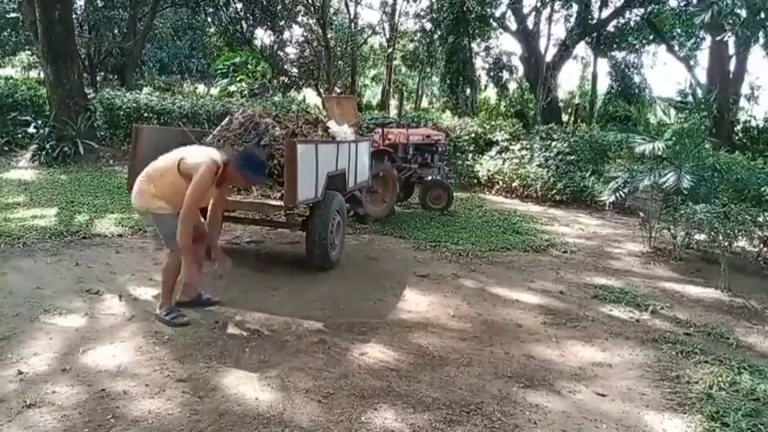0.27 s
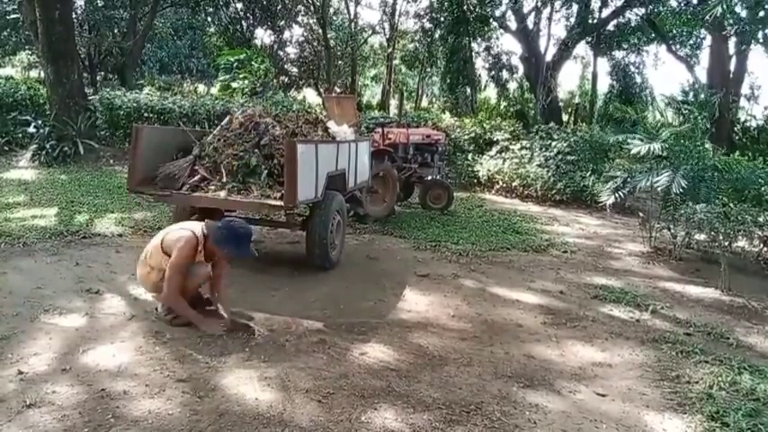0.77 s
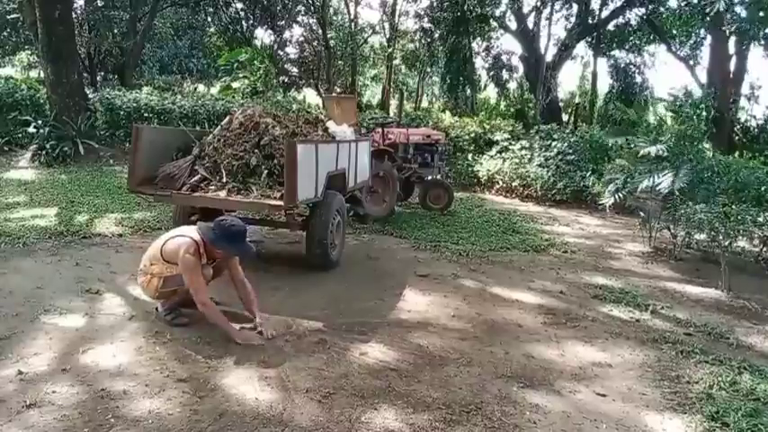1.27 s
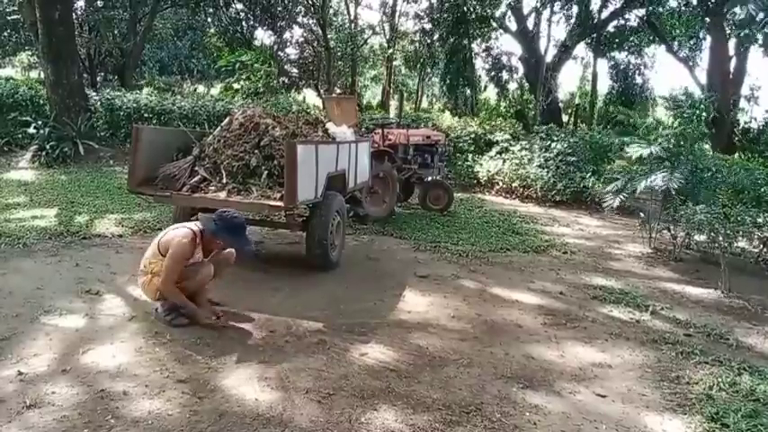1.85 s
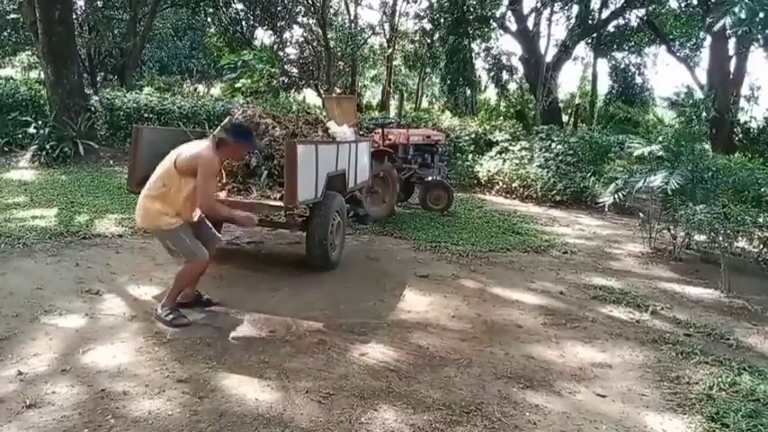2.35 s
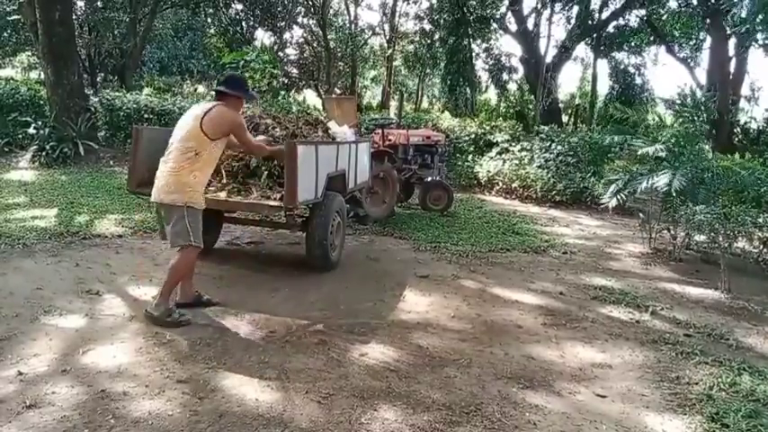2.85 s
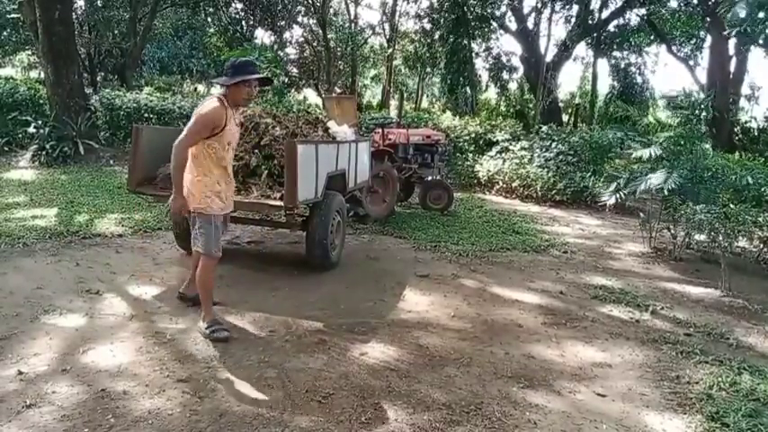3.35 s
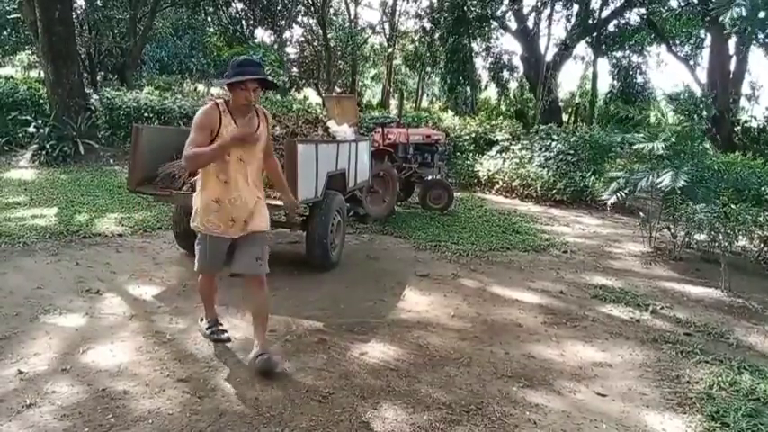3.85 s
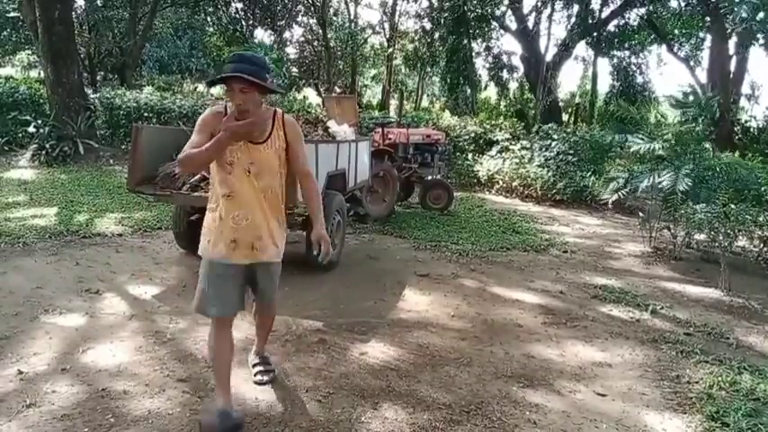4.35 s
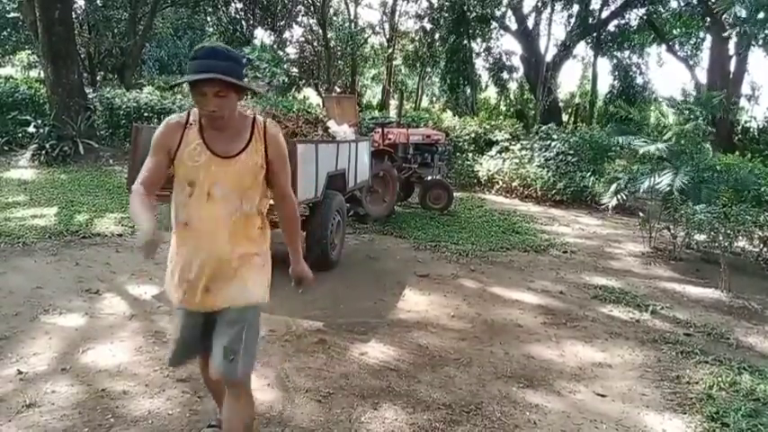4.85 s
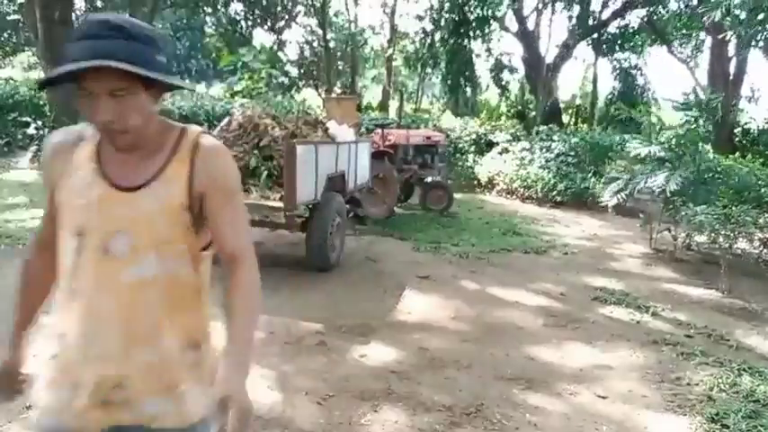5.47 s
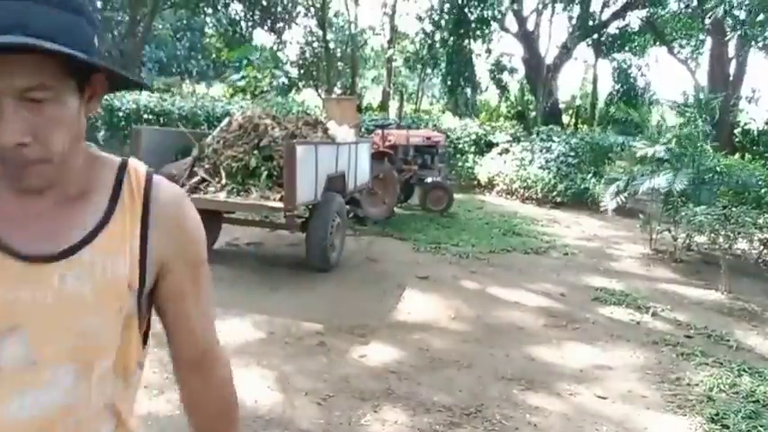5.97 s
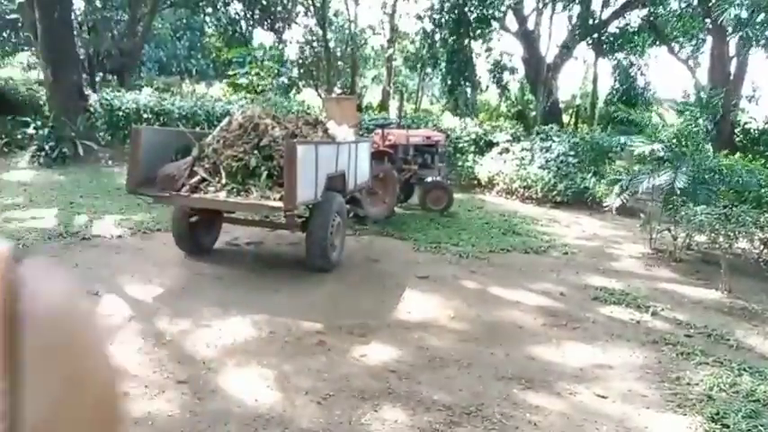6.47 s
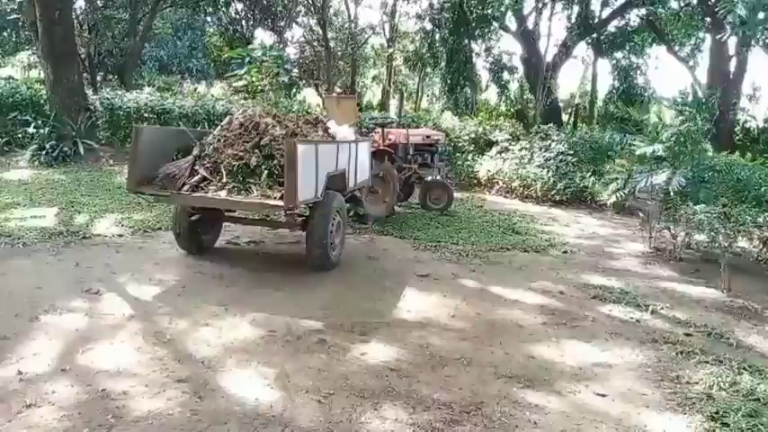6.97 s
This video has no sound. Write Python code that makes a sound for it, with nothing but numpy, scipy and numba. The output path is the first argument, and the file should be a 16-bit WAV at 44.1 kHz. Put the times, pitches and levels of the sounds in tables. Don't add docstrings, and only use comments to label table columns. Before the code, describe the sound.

Low, fluttering wind thuds dominate, with hard membrane slaps early and near two, four and six seconds. Behind them lie distant insects, leaves, a faint throbbing croak and scattered bird whistles blurred by foliage. Twigs knock quietly on a cart, then someone walks up in sandals, crunching grit close to the phone before lighter scuffs end it. The background dips after strong gusts and slowly returns.

```python
import sys
import numpy as np
from scipy import signal
from scipy.io import wavfile
from scipy.ndimage import uniform_filter1d
from numba import njit

SR = 44100
rng = np.random.default_rng(int(sys.argv[2]) if len(sys.argv) > 2 else 0)


def generate_wav(signal):
    frames = np.transpose(np.atleast_2d(signal))
    scaled = np.clip(frames, -1, 1) * 32767
    pcm = np.round(scaled).astype(np.int16)
    wavfile.write(sys.argv[1], SR, pcm)


def makeup_ratio(level_db):
    decades = np.asarray(level_db, float) / 20
    return 10 ** decades


N = 318843
T = np.arange(N) / SR


def columns(table):
    time_s, *values = np.transpose(table)
    return [np.interp(T, time_s, value) for value in values]


def unit(x):
    return x / np.sqrt(np.mean(x ** 2))


@njit
def svf(x, hz, width):
    y, b, l, g, last = np.empty(len(x)), 0., 0., 0., 0.
    for i in range(len(x)):
        if hz[i] != last:
            g, last = np.tan(np.pi * hz[i] / SR), hz[i]
        k = width[i] / hz[i]
        v = (b + g * (x[i] - l)) / (1 + g * (g + k))
        b, l, y[i] = 2 * v - b, l + 2 * g * v, k * v
    return y


def band(x, hz, width_hz):
    return svf(x, np.clip(hz + 0 * T, 20, .45 * SR), np.maximum(width_hz + 0 * T, 5))


def edges(x, low_hz, high_hz):
    return signal.sosfilt(signal.butter(4, [low_hz, high_hz], "bandpass", fs=SR, output="sos"), x)


def below(x, hz):
    return signal.sosfilt(signal.butter(8, hz, fs=SR, output="sos"), x)


def walk(rate):
    hold = int(SR / rate)
    levels = np.repeat(rng.standard_normal(N // hold + 1), hold)
    return 0.88 * uniform_filter1d(uniform_filter1d(levels, hold), hold)[:N]


def steady(x, hold_s, share):
    power = uniform_filter1d(x ** 2, int(hold_s * SR)) + 0.16 * np.mean(x ** 2)
    return unit(x / power ** (share / 2))


def humps(centre_s, half_s, db, edge_db, square, hasty=0.):
    power = np.zeros(N)
    for s, half, top_db in zip(centre_s, half_s, db):
        near = slice(max(int((s - 4 * half) * SR), 0), int((s + 4 * half) * SR))
        away = np.abs((T[near] - s) / half * (1 + hasty * (T[near] < s)))
        power[near] += makeup_ratio(2 * (top_db - edge_db * away ** square))
    return np.sqrt(power)


def gain_db():
    # (time [s], drop [dB])
    ducks = [
        (.487, 10.5),
        (1.866, 1.5),
        (2.0, 0),
        (2.45, 0.5),
        (3.45, 0),
        (4.56, 1),
        (5.62, 0.5),
        (6.17, 4),
        (7.15, 2.5),
    ]
    opening_db, recover_s = 4, 1
    out = opening_db * (T < ducks[0][0])
    for s, drop_db in ducks:
        out = out - drop_db * (T >= s) * np.exp(-np.abs(T - s) / recover_s)
    return out


def patches(shape, size):
    field = rng.standard_normal(shape)
    for axis in (0, 0, 1, 1):
        field = uniform_filter1d(field, size[axis], axis=axis)
    return unit(field)


def hiss(spectrum, patch_db, swell_db):
    f, _, z = signal.stft(rng.standard_normal(N), SR, nperseg=1024)
    hz, db = np.transpose(spectrum)
    colour_db = np.interp(np.log(f + 1), np.log(hz), db, left=-99, right=-99)[:, None]
    patch_db = patch_db * np.clip((12500 - f[:, None]) / 1500, .3, 1)
    mottle_db = patch_db * patches(z.shape, size=(3, 3)) + swell_db * patches(z.shape, size=(30, 6))
    return signal.istft(z * makeup_ratio(colour_db + mottle_db), SR)[1][:N]


def whistle(hz, width_hz):
    air = band(rng.standard_normal(N), hz, width_hz)
    return steady(band(air, hz, 0.48 * width_hz), 0.012, 0.19)


def frogs(level_db):
    throb = np.sin(np.pi * np.cumsum(14.8 * (1 + 0.17 * walk(6.7))) / SR) ** 2
    return makeup_ratio(level_db + 1.4 * walk(2.9)) * throb ** 1.6 * whistle(1280 + 30 * walk(11), 57)


def yard():
    # (frequency [Hz], level [dB per Hz])
    insect_colour = [(2350, -9), (4000, -63), (4810, -11.5), (5520, -0.5), (6050, -9), (6230, -1),
                     (6630, 4.5), (8740, -8), (9420, -18), (10800, -6), (11300, -14), (12200, -25.5),
                     (13400, -23), (14900, -22), (15800, -15)]
    # (frequency [Hz], level [dB per Hz])
    leaf_colour = [(35, -49), (60, 0), (139, 7), (172, -1.5), (305, -8), (334, -12.5), (406, -11.5),
                   (635, -17), (707, -13), (1030, -14.5), (1230, -8.5), (1350, -12), (2260, -20),
                   (2700, -16.5), (4300, -24.5), (5590, -23.5), (9460, -120)]
    # (centre [s], half length [s], insects [dB], leaves [dB])
    swells = [
        (0.0, 0.27, -35, -42),
        (1.695, 0.28, -43.5, -51.5),
        (3.283, 0.13, -39, -46),
        (4.376, 0.26, -41, -45.5),
        (5.502, 0.39, -47, -44.5),
        (6.094, 0.14, -39.5, -42.5),
    ]
    s, half, insects_db, leaves_db = np.transpose(swells)
    gain = gain_db()
    insects_gain = np.hypot(makeup_ratio(-38 + gain), humps(s, half, insects_db, 9, 6))
    leaves_gain = np.hypot(makeup_ratio(-42 + gain), humps(s, half, leaves_db, 10, 3.1))
    insects = hiss(insect_colour, 3.94, 0.61)
    leaves = hiss(leaf_colour, 3.35, 1.03)
    insects = insects / np.std(edges(insects, 6200, 9000))
    leaves = leaves / np.std(edges(leaves, 500, 3500))
    return insects_gain * insects + leaves_gain * (leaves + frogs(-3.0))


def slaps():
    # (time [s], peak [dB], edge [dB])
    slap_list = [(0.453, -5, -18), (0.48, 2.5, -14), (1.442, -25, -47), (1.858, -14, -20.5),
                 (1.906, -20, -44), (2.438, -23, -38), (2.829, -16, -32), (3.274, -20, -45),
                 (4.249, -9, -59), (4.263, -6, -60), (4.557, -20, -45), (5.652, -24, -36),
                 (5.979, -24, -43), (6.133, -23, -17), (6.498, -33, -31), (6.679, -22, -47),
                 (6.897, -25.5, -47)]
    slap_hz = 148
    turn = np.arange(int(2 * SR / slap_hz)) * slap_hz / SR
    swing = np.sin(2 * np.pi * turn) * np.exp(-((turn - 1) / 0.34) ** 2)
    out, edge = np.zeros(N), np.zeros(N)
    for s, db, edge_db in slap_list:
        i = int((s + 0.00495 - 1 / slap_hz) * SR)
        out[i:i + len(turn)] -= makeup_ratio(db + 6.0) * swing
        edge[i + int(.9 * SR / slap_hz)] = -makeup_ratio(edge_db)
    return out + 30 * band(band(edge, 640, 460), 470, 730)


def wind():
    # (centre [s], half length [s], rumble [dB],
    # flap above a level 20 dB under the rumble [dB])
    gusts = [(0.06, 0.044, -8, -8), (0.14, 0.019, -8, -9), (0.281, .022, -11, -13),
             (0.414, 0.015, -10.5, 5), (0.465, 0.051, -12.5, 3), (1.86, 0.024, -4.5, 1),
             (1.916, 0.017, -5, 7), (1.992, 0.032, -12.5, -1.5), (2.246, 0.019, -12.5, 0),
             (2.449, 0.014, -6.5, 7), (2.616, 0.041, -12, 2), (2.843, 0.027, -7.5, 7.5),
             (2.936, 0.035, -13.5, -2), (3.081, 0.046, -16, 4), (3.275, 0.025, -17, 12),
             (4.206, 0.046, -16.5, -3), (4.262, 0.022, -8.5, 11), (4.364, 0.026, -17.5, -7),
             (4.571, 0.028, -14.5, -4), (5.059, .04, -15, -1), (5.122, 0.015, -14, -6),
             (5.164, 0.014, -18, -2), (5.522, 0.03, -10.5, 3), (5.565, 0.027, -11, 7),
             (6.065, 0.04, -5, 2), (6.137, 0.026, -3.5, -8), (6.216, 0.03, -17, -8),
             (6.448, 0.026, -18, 1), (6.502, 0.0099, -6.5, -4),
             (0.22, 0.046, -26, 0), (0.559, 0.029, -20.5, 8), (0.696, 0.037, -32, -9),
             (1.002, 0.091, -39.5, 0), (1.363, 0.077, -30.5, -7), (1.461, 0.021, -19.5, 6),
             (1.545, 0.069, -28, 6.5), (1.668, .05, -23.5, -4), (1.803, 0.067, -25, -3),
             (2.183, 0.042, -24, -6), (2.399, 0.042, -19.5, 2), (4.02, 0.025, -42, 0),
             (4.325, 0.021, -20.5, -4), (4.42, 0.024, -27.5, 11), (4.486, 0.034, -28, -11),
             (4.74, 0.12, -24.5, -8), (4.832, .03, -22.5, 9), (4.936, 0.058, -22.5, -8),
             (5.361, 0.058, -24.5, -5), (5.692, 0.044, -23, 3), (5.771, 0.04, -20, -9),
             (5.968, 0.039, -22, -3), (6.3, 0.039, -27, -4), (6.375, 0.016, -20, -2),
             (6.577, 0.032, -25, -4), (6.686, 0.028, -23, 2), (6.747, 0.044, -24, 0),
             (6.91, 0.092, -24.5, 5), (7.053, 0.089, -30.5, 2), (7.198, 0.031, -24.5, 7)]
    edge_db, square, calm_db = 9, 2.13, -48.5
    s, half, db, flap_db = np.transpose(gusts)
    rumble_gain = humps(s, half, db, edge_db, square) + makeup_ratio(calm_db + gain_db())
    flap_gain = humps(s, 0.65 * half, db + flap_db - 20.0, edge_db, square)
    eddy_hz = 80 + 39.5 * rumble_gain
    eddies = below(band(rng.standard_normal(N), eddy_hz, 56.4), 153.5)
    eddies = steady(eddies, 0.0267, 0.45)
    flap = steady(edges(rng.standard_normal(N), 148.4, 267), 0.004, 0.46)
    out = below(rumble_gain * eddies + flap_gain * flap, 237) + slaps()
    return signal.sosfilt(signal.butter(3, 48, "highpass", fs=SR, output="sos"), out)


def calls(table, sag_hz):
    pitch_hz, loud = np.full((2, N), 1000.), np.zeros((2, N))
    for k, (s, length, note_hz, note_db) in enumerate(table):
        start = int((s - length / 5) * SR)
        u = np.clip((T[start:] - s) / length, 0, 1)
        pitch_hz[k % 2, start:] = note_hz - sag_hz * u
        loud[k % 2, start:] += 1.14 * makeup_ratio(note_db) * np.sqrt(np.sin(np.pi * u).clip(0))
    return sum(gain * whistle(hz, 25 + 0.035 * hz) for hz, gain in zip(pitch_hz, loud))


def birds():
    # (time [s], length [s], pitch [Hz], level [dB])
    twitters = [(.03, 0.097, 5460, -35.5), (.14, 0.14, 5850, -48), (.135, 0.045, 3200, -36),
                (.165, 0.022, 2934, -40.5), (.555, 0.022, 3170, -50.5), (.61, 0.045, 3090, -39.5),
                (.63, 0.043, 2590, -50.5), (.755, 0.036, 2420, -53), (2.8, 0.076, 3270, -46.5),
                (4.02, 0.045, 4014, -44.5), (4.235, 0.047, 2910, -36), (4.25, 0.042, 2610, -30.5),
                (4.385, 0.037, 2616, -30), (4.4, 0.036, 2300, -44), (5.0, 0.081, 5270, -41),
                (6.52, 0.046, 2453, -33.5), (6.55, 0.076, 3330, -47), (6.675, 0.032, 3560, -50),
                (6.76, 0.085, 3800, -51), (6.85, 0.021, 2630, -43.5), (7.06, 0.05, 2580, -38),
                (7.075, 0.12, 3120, -43.5)]
    # (time [s], length [s], pitch [Hz], level [dB])
    coos = [(2.91, 0.055, 685, -37.5), (3.2, 0.047, 1200, -40), (3.44, 0.068, 699, -44),
            (5.38, 0.098, 810, -41.5), (5.67, 0.032, 800, -43), (5.8, 0.046, 795, -41.5),
            (6.27, 0.032, 1930, -48), (6.33, 0.035, 776, -37.5), (6.57, 0.081, 1460, -48),
            (6.66, 0.033, 1590, -39.5), (7.07, 0.11, 1532, -36.5), (7.19, 0.047, 1264, -39)]
    # (time [s], pitch
    # [Hz], level [dB])
    sweep_parts = [
        [(.885, 6450, -44), (.905, 6670, -32.5), (.925, 6800, -27.5), (.94, 6450, -31), (.952, 6050, -34),
         (.975, 5860, -52), (1.05, 6100, -46), (1.08, 6100, -55)],
        [(.925, 5550, -50), (.94, 5500, -42), (.965, 5420, -28), (.98, 5130, -31.5), (1.0, 5100, -40),
         (1.02, 4690, -36), (1.05, 4870, -49), (1.075, 4730, -56)],
    ]
    chirp = 0
    for sweep_part in sweep_parts:
        hz, db = columns(sweep_part)
        sounding = (T > sweep_part[0][0]) * (T < sweep_part[-1][0])
        chirp = chirp + sounding * makeup_ratio(db) * whistle(hz, 320)
    far = calls(twitters, sag_hz=92.5) + calls(coos, sag_hz=0)
    t = np.arange(int(.4 * SR)) / SR
    tail = rng.standard_normal(len(t)) * np.exp(-np.log(1000) * t / .5)
    tail = tail / np.sqrt(np.sum(tail ** 2))
    echo = signal.fftconvolve(makeup_ratio(-1) * chirp + makeup_ratio(-15.5) * far, tail)[:N]
    return chirp + far + echo


def grains(rate, scatter_db):
    draw = rng.random((3, N))
    hit = draw[0] < rate / SR
    return hit * np.sign(draw[1] - .5) * makeup_ratio(-scatter_db * np.log(draw[2] + 1e-9))


def pebbles():
    # (time [s], peak [dB], low part above peak [dB])
    snaps = [
        (5.5468, -18, -15),
        (5.5626, -2, -8),
        (5.592, -2, -11),
        (5.6021, 8.5, -17),
        (5.5756, -20, 8),
        (5.96, -14, -17),
        (6.0144, -31, -15),
        (6.5725, -24, -13),
    ]
    high, low = np.zeros(N), np.zeros(N)
    for s, db, low_db in snaps:
        high[int(s * SR) + 40] = makeup_ratio(db)
        low[int(s * SR) + 40] = makeup_ratio(db + low_db)
    ring = 5 * band(band(high, 5500, 1000), 5100, 2500) + 0.65 * band(high, 10600, 6000)
    return ring + 8 * band(band(low, 1100, 1000), 1200, 1600)


def steps():
    # (centre [s], half length [s], sole [dB], sand [dB], dust [dB])
    scuffs = [(1.28, 0.021, -59, -54, -55), (2.856, .02, -37.5, -40, -60), (2.924, 0.023, -35.5, -44, -58),
              (3.13, 0.015, -37, -48, -57), (3.25, 0.12, -58, -49, -62), (4.016, 0.023, -37.5, -53, -62),
              (4.513, .012, -35, -35, -58), (4.541, .025, -28, -37, -59), (5.092, 0.087, -38.5, -40.5, -52),
              (5.548, 0.0092, -41, -19, -21.5), (5.573, 0.023, -23, -17.5, -27),
              (5.605, 0.017, -23.5, -26, -34), (5.957, 0.019, -44, -37, -45),
              (6.055, 0.036, -36.5, -26, -27.5), (6.08, 0.013, -29.5, -27, -39),
              (6.12, 0.018, -36, -35, -44), (6.55, 0.041, -31.5, -37, -37.5), (6.577, .003, -50, -50, -27),
              (7.097, .045, -35.5, -37, -50)]
    # (frequency [Hz], width [Hz], level [dB])
    sole_rings = [(1257, 275, 20), (1500, 360, 16.5), (2300, 750, 8.5), (3200, 320, 10.5), (3960, 670, 2)]
    # (frequency [Hz], width [Hz], share taken out)
    port_dips = [(4400, 390, 0.52), (9200, 800, 0.47)]
    s, half, *layers_db = np.transpose(scuffs)
    sole_gain, sand_gain, dust_gain = (humps(s, half, db, 5.5, 2.3, hasty=0.26) for db in layers_db)
    sole = 0
    for hz, width, db in sole_rings:
        ring = band(band(grains(600, 1.9), hz, width), hz, 2.4 * width)
        sole = sole + makeup_ratio(db + 4.8 * walk(40)) * ring
    sole = steady(unit(sole), 0.076, 1.0)
    sand = makeup_ratio(2.7 * walk(150)) * grains(6700, 2.4)
    sand = unit(band(band(sand, 6950, 1800), 4600, 3900))
    dust = unit(edges(makeup_ratio(3.4 * walk(280)) * grains(9000, 1.8), 10800, 18000))
    out = sole_gain * sole + sand_gain * sand + dust_gain * dust
    for hz, width, share in port_dips:
        out = out - share * band(out, hz, width)
    return out + pebbles()


def scene():
    return (yard() + wind() + birds() + steps())[None]


def band_limit(x):
    return signal.sosfilt(signal.butter(12, 16160, fs=SR, output="sos"), x)


def record(dry):
    rounded = dry / (1 + np.abs(dry / .95) ** 6) ** (1 / 6)
    cut = signal.sosfilt(signal.ellip(10, .3, 60, 15480, fs=SR, output="sos"), rounded)
    return band_limit(cut)


dry = scene()
out = record(dry)
generate_wav(out)
```